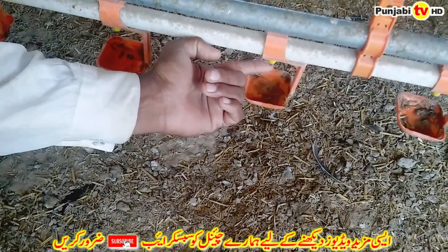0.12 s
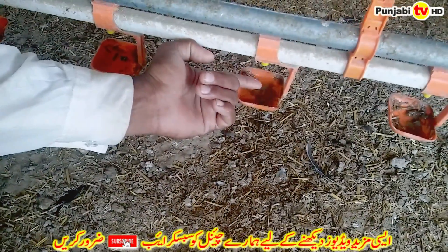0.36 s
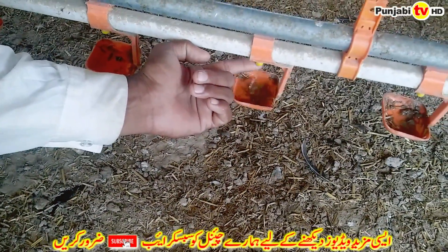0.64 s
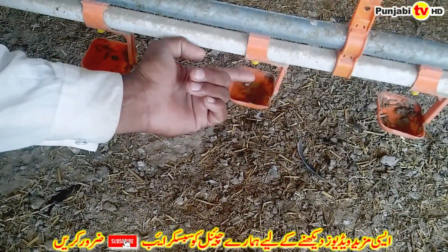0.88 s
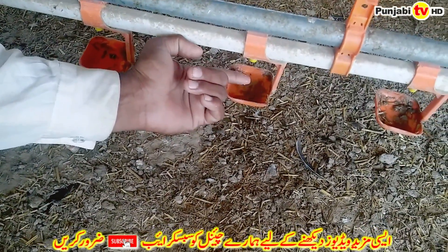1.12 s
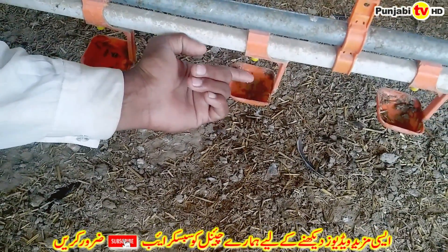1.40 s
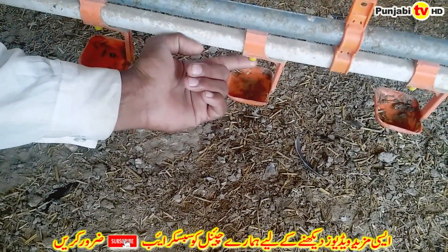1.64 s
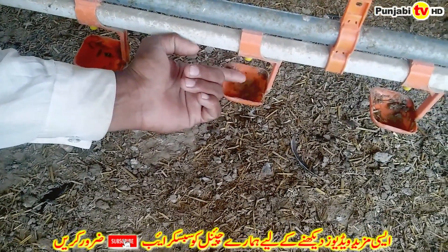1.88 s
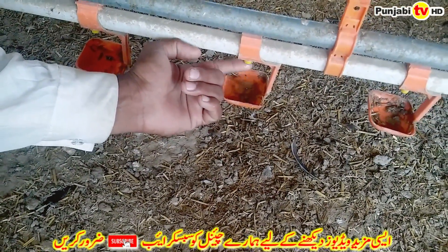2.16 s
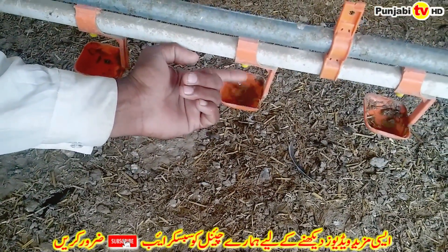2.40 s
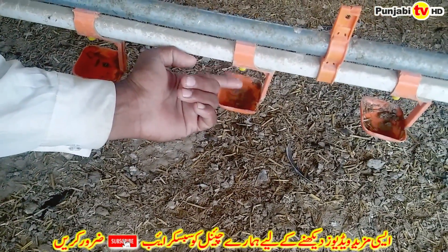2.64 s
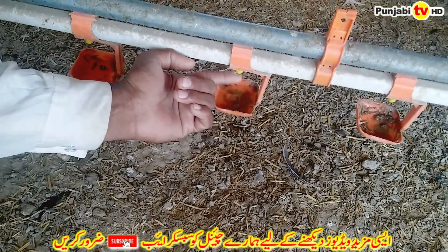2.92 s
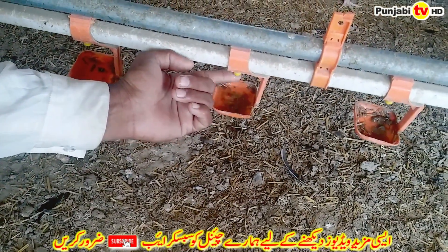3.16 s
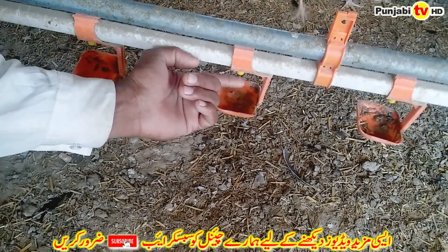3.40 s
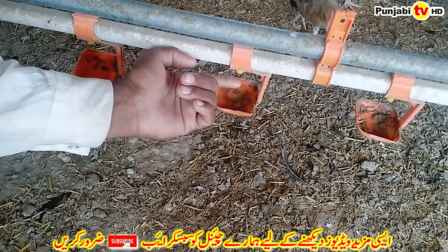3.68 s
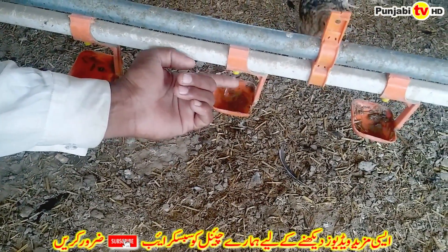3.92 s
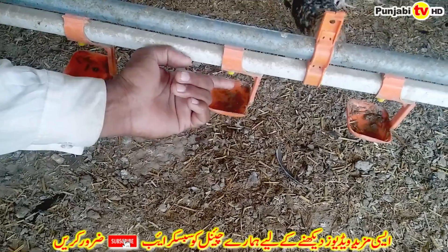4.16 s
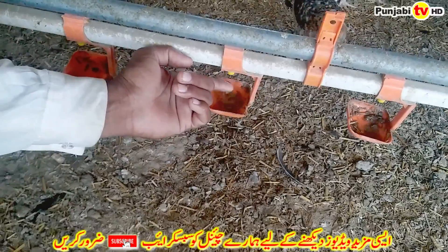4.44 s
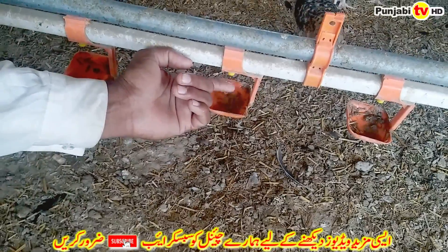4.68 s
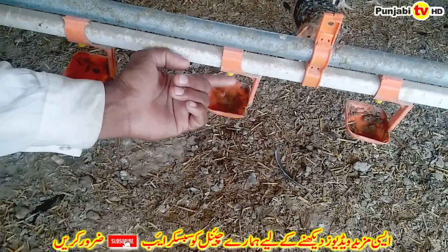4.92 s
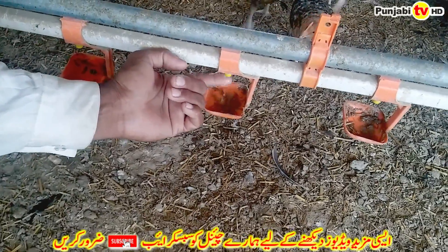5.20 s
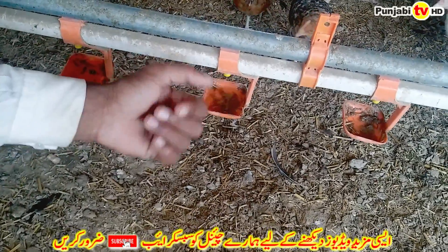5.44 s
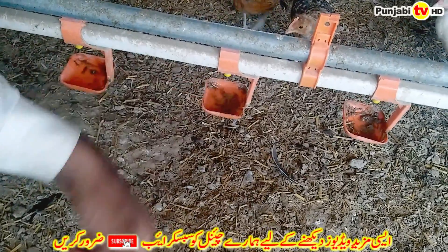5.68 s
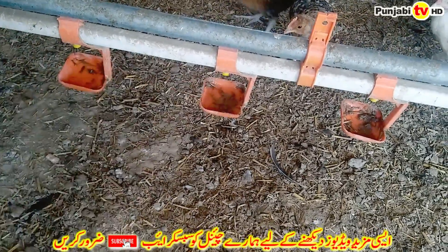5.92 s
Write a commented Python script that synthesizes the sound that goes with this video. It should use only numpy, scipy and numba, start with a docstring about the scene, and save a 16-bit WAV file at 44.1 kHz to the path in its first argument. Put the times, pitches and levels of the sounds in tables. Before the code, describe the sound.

Hundreds of chicks peep in a high continuous wash while a hand rattles drinker parts; one bird trills near the start, another squawks near the end.

```python
"""Shed of young chickens

Countless far peeps, glides of some tens of milliseconds, merge into a shrill wash; nearer ones glide through it.
One bird trills and one squawks close by, each with several rough voices at once. A flicked drinker pin and
knocked plastic ring as dying modes, scratched litter is crackly noise, the air is coloured noise, and a thin
electrical whine is a tone chopped sixty times a second."""
import sys
import numpy as np
from scipy import signal
from scipy.fft import rfft, irfft, next_fast_len
from scipy.io import wavfile
from scipy.ndimage import uniform_filter1d
from numba import njit

SR = 44100
rng = np.random.default_rng(int(sys.argv[2]) if len(sys.argv) > 2 else 0)


def gain_from_decibels(decibels):
    """Convert decibel values to linear amplitude factors."""
    exponent = np.asarray(decibels, float) / 20
    return 10 ** exponent


def put_to_file(sound):
    """Save the sound as 16-bit audio at rate SR, in the file named by the first command-line argument."""
    columns = np.atleast_2d(sound).T  # one column per channel
    safe = np.clip(columns, -1, 1)
    whole_steps = np.round(safe * 32767)
    wavfile.write(sys.argv[1], SR, whole_steps.astype(np.int16))


N = 267466


def evened(x):
    """Scales to rms 1."""
    return x / np.sqrt(np.mean(x ** 2) + 1e-20)


def read(points, hz):
    """Reads a spectrum on a log-frequency axis."""
    f, value = np.transpose(points)
    return np.interp(np.log(hz + 1), np.log(f + 1), value)


def gain_curve(points):
    """Gain over the scene from (t/s, level/dB) points."""
    s, db = np.transpose(points)
    return gain_from_decibels(np.interp(np.arange(N) / SR, s, db))


def add(mix, s, sound):
    """Mixes a sound in at s seconds."""
    part = mix[max(round(s * SR), 0):][:len(sound)]
    part += sound[:len(part)]


def coloured(x, db_at):
    """Filters x by a rule that gives dB at each frequency."""
    size = next_fast_len(len(x))
    gain = gain_from_decibels(db_at(np.fft.rfftfreq(size, 1 / SR)))
    return irfft(rfft(x, size) * gain, size)[:len(x)]


def wander(length, smooth_s):
    """Smooth random curve of rms 1."""
    size = max(round(smooth_s * SR), 2)
    once = uniform_filter1d(rng.standard_normal(length), size)
    return evened(uniform_filter1d(once, size))


def patchy(spectrum, patchy_db):
    """Noise of a given colour in patches that drift over time and frequency; rms 1."""
    frames, hz = N // 256 + 5, np.fft.rfftfreq(1024, 1 / SR)
    a, b, patches = rng.standard_normal((frames, 513, 3)).T
    patches = uniform_filter1d(patches, 8, 0)
    patches = evened(uniform_filter1d(patches, 10, 1))
    z = (a + 1j * b) * gain_from_decibels(read(spectrum, hz)[:, None] + patchy_db * patches)
    return evened(signal.istft(z, nperseg=1024, noverlap=768)[1][:N])


def shed(x):
    """Reverberation: sparse echoes of random sign, each band dying at its own speed."""
    # decay of the room: f/Hz, t60/s
    decay = [(300, 0.67), (1500, 0.94), (3000, 1), (6000, 0.2), (12000, 0.7)]
    taps = np.zeros(SR)
    at = np.arange(300, SR - 20, 20)
    taps[at + rng.integers(0, 20, len(at))] = rng.choice([-1., 1.], len(at))
    hz, t, z = signal.stft(taps, SR, nperseg=256)
    z = z * gain_from_decibels(-60 * t / read(decay, hz)[:, None])
    tail = signal.istft(z, SR, nperseg=256)[1]
    return signal.fftconvolve(x, tail / np.linalg.norm(tail))[:len(x)]


def whine():
    """Electrical whine: each chop restarts the tone, a little above or below its centre."""
    level_db, centre_hz, offset_hz = -68, 8850, 55
    chops_per_s, start_s, on_share = 59.995, .0035, .76
    chops = (np.arange(N) / SR - start_s) * chops_per_s + 1
    which, u = chops.astype(int), chops % 1
    side, wobble = rng.random((which[-1] + 1, 2)).T
    hz = centre_hz + offset_hz * (np.sign(side - .5) + wobble - .5)
    gate = np.clip(np.minimum(u, on_share - u) / .08, 0, 1)
    tone = np.sin(2 * np.pi * hz[which] * u / chops_per_s)
    return gain_from_decibels(level_db) * evened(gate * tone)


def air():
    """Noise: steady drone of fans, changing rumble of shuffling feet, hiss of the farthest birds."""
    # rumble of feet: t/s, level/dB rms
    rumble = [(0.0, -49.5), (0.13, -50), (0.57, -46), (0.99, -50), (2.41, -48.5), (2.62, -52), (3.04, -49),
              (3.93, -53.5), (5.7, -50), (6.06, -53.5)]
    # spectra of feet, fans and hiss: f/Hz, relative density/dB
    feet_colour = [(80, -29), (140, -7), (200, 2), (280, 0.5), (500, -4.5), (1300, -7), (2500, -45)]
    fans_colour = [(25, -60), (40, -12.5), (55, 0), (90, -2.5), (140, -5), (250, -26), (600, -60)]
    hiss_colour = [(3800, -10), (5000, 9), (6000, 8), (6800, 3), (7400, -4), (8200, -9), (10000, -12),
                   (13000, -25), (15700, -30)]
    feet = gain_curve(rumble) * patchy(feet_colour, 2.2)
    fans = gain_from_decibels(-55) * patchy(fans_colour, 0.44)
    hiss = gain_from_decibels(-55) * patchy(hiss_colour, 2.5)
    return feet + fans + hiss


@njit
def scatter(length, starts, sizes, hz, fall, lengths, unsteady, overtone, rate):
    """Sums falling glides; each reads the unsteadiness from its own place."""
    out = np.zeros(length)
    for k in range(len(starts)):
        angle = 0.
        for i in range(min(lengths[k], length - starts[k])):
            u = i / lengths[k]
            glide_hz = hz[k] * (1 - fall[k] * (u - .5))
            angle += 2 * np.pi * glide_hz * unsteady[(k * 7919 + i) % length] / rate
            out[starts[k] + i] += sizes[k] * u * (1 - u) * np.sin(angle + overtone * np.sin(angle))
    return out


def flock(count=4800):
    """Many hundreds of falling peeps a second, at every pitch a chick can reach and many strengths."""
    # loudness of the far flock: t/s, level/dB
    loudness = [(0.0, -34.5), (0.25, -34), (0.61, -35), (0.99, -33.5), (3.39, -36.5), (3.88, -35),
                (4.08, -35.5), (6.06, -34.5)]
    # filter on the flock: f/Hz, gain/dB
    colour = [(1400, -21), (2000, -16), (2600, -5), (3300, -1), (4000, -3), (4800, -14), (6000, -13),
              (7000, -12.5), (8200, -40), (12000, -72)]
    when, pitch, fall, length, size = rng.random((count, 5)).T
    total = N + SR  # the first second only fills the echoes
    starts = (when * total).astype(np.int64)
    sizes = gain_from_decibels(-2.3 * np.log(size + .04))
    lengths = ((.025 + .06 * length) * SR).astype(np.int64)
    unsteady = 1 + 0.0078 * wander(total, 0.0031)
    out = scatter(total, starts, sizes, 1400 * 2 ** (2.1 * pitch), .06 + .25 * fall,
                  lengths, unsteady, 0.15, SR)
    out = coloured(out, lambda hz: read(colour, hz))
    # the flock's echo drifts round between three different reverberation tails
    turn = np.arange(total) * 2 * np.pi * 3.1 / SR
    echoes = sum(shed(out * np.cos(turn + k * np.pi / 3)) for k in range(3))
    far = evened(evened(echoes) + .82 * evened(out))[SR:]
    return far * gain_curve(loudness)


def scratches():
    """Feet and beaks in dry litter: crackly noise bursts that start sharply, duller toward the treble."""
    # bursts: t/s, level before filtering/dB, decay to 1/e/s, treble fall from 5.2 to 10.5 kHz/dB per octave
    bursts = [(0.453, -52.5, 0.023, 20.5), (0.6, -59.5, 0.05, 18), (0.779, -56, 0.034, 21),
              (0.85, -60.5, 0.047, 27), (0.991, -60, 0.034, 27), (1.3778, -56, 0.021, 19),
              (1.926, -63.5, 0.056, 31), (1.99, -60, 0.03, 29.5), (2.2029, -55.5, 0.041, 13),
              (2.95, -65, 0.027, 15), (3.274, -52.5, 0.011, 32), (3.311, -47.5, 0.011, 29.5),
              (3.6526, -66, 0.038, 2), (4.21, -63.5, 0.044, 18), (4.308, -63, 0.038, 14),
              (4.546, -55, 0.065, 14), (4.657, -53.5, 0.022, 20), (5.238, -61, 0.085, 26),
              (5.4969, -53, 0.035, 2), (5.561, -57, 0.03, 32), (5.931, -56.5, 0.016, 16)]
    # filter of the litter: f/Hz, gain/dB
    litter = [(500, -35), (3500, 0), (10500, 0), (13000, -4), (16000, -7)]
    out = np.zeros(N)
    t = np.arange(round(.15 * SR)) / SR
    for s, db, length, dull_db in bursts:
        grit = rng.standard_normal(len(t)) * gain_from_decibels(3 * wander(len(t), .002))
        grit = coloured(grit, lambda hz: read(litter, hz)
                        - dull_db * np.log2(np.clip(hz, 5200, 10500) / 10500))
        shape = np.exp(-(t / max(length, .003)) ** 2) * np.minimum(t / .001, 1)
        add(out, s, gain_from_decibels(db - 0.5) * grit * shape)
    return out


def pin():
    """Drinker pin flicked by a finger: small steel rings very high and briefly."""
    # flicks: t/s, level of a 0 dB mode/dB
    flicks = [(0.2728, -51), (0.9637, -46.5), (2.0757, -63), (2.1211, -65), (3.1428, -58), (3.1916, -62),
              (3.2266, -62), (4.0861, -61), (5.9733, -68)]
    # modes of the pin: f/Hz, level/dB, t60/s
    modes = [(11200, -1.5, 0.062), (11300, -7, .06), (9500, -10, .04)]
    out, t = np.zeros(N), np.arange(round(.2 * SR)) / SR
    sound = sum(gain_from_decibels(db - 60 * t / t60) * np.sin(2 * np.pi * hz * t) for hz, db, t60 in modes)
    for s, db in flicks:
        add(out, s, gain_from_decibels(db) * sound)
    return out


def ring(modes, weights_db, length_s=.2):
    """Dying modes after a blow, slightly detuned each time; peak 1."""
    t = np.arange(round(length_s * SR)) / SR
    detune = 1 + 0.033 * rng.standard_normal(len(modes))
    sound = np.zeros(len(t))
    for (hz, db, t60), weight_db, d in zip(modes, weights_db, detune):
        sound += gain_from_decibels(db + weight_db - 60 * t / t60) * np.sin(2 * np.pi * hz * d * t)
    return sound / abs(sound).max()


def knocks(faint_count=50):
    """Cups and pipe: soft rattles with a rebound excite the modes near the spot's pitch; faint pecks between."""
    # blows: t/s, peak level/dB, pitch of the spot struck f/Hz
    blows = [(0.356, -27.5, 1210), (0.59, -25.5, 1060), (0.42, -36, 320), (0.605, -33, 720),
             (0.78, -27.5, 623), (1.012, -36, 1050), (1.168, -37.5, 1200), (1.253, -32, 690),
             (1.26, -31, 1050), (1.738, -33.5, 900), (2.441, -28.5, 348), (2.462, -33, 300),
             (2.593, -39, 690), (2.851, -39.5, 867), (3.051, -36, 725), (3.252, -39, 260), (4, -38, 1090),
             (4.418, -34, 1230), (4.599, -29, 1210), (4.644, -30, 1210), (4.652, -37, 600),
             (4.765, -36, 720), (4.926, -31.5, 1200), (4.976, -34, 1060), (5.023, -32.5, 1200),
             (5.171, -28.5, 775), (5.195, -34, 480), (5.281, -28, 700), (5.3, -34, 450),
             (5.361, -37.5, 576), (5.53, -35, 1000), (5.562, -33, 1000), (5.565, -36, 270),
             (5.881, -37, 656)]
    # modes of the plastic: f/Hz, level/dB, t60/s
    plastic = [(285, 2, 0.044), (405, 1.5, 0.032), (605, 1.5, 0.085), (719, 6, 0.05), (881, 4.5, 0.03),
               (1097, 8.5, 0.054), (1200, 8.5, 0.032), (1400, -8, 0.038)]
    out, hz, t = np.zeros(N), np.transpose(plastic)[0], np.arange(3000) / SR
    faint = [(when * N / SR, -46 + 7 * size, 500 * 3 ** spot)
             for when, size, spot in rng.random((faint_count, 3))]
    late = np.maximum(t - .022, 0)
    push = t * np.exp(-t / .005) + .12 * late * np.exp(-late / .008)  # blow and rebound
    for s, db, spot_hz in list(blows) + faint:
        rattle = rng.standard_normal(len(t)) * push
        sound = signal.fftconvolve(ring(plastic, -24 * abs(np.log2(hz / spot_hz))), rattle)
        # little below the spot's pitch
        sound = coloured(sound, lambda f: -14 * np.maximum(np.log2(spot_hz / (f + 1)) - .5, 0))
        add(out, s - .003, gain_from_decibels(db) * sound / abs(sound).max())
    return out


def voice(hz, jitter, flutter_db, overtones_db):
    """The syrinx: nearly a sine with unsteady pitch and strength, and weak overtones."""
    turns = np.cumsum(hz * (1 + jitter * wander(len(hz), 0.0017))) / SR
    partials_db = [0, *overtones_db]
    tone = sum(gain_from_decibels(db) * np.sin(2 * np.pi * k * turns) for k, db in enumerate(partials_db, 1))
    return np.sqrt(2) * tone * gain_from_decibels(flutter_db * wander(len(hz), 0.0026))


def peeps(rows):
    """Each peep is one glide with a quick start and a softer end; low voices are hoarser."""
    out = np.zeros(N)
    for s, db, length, start_hz, end_hz in rows:
        u = np.linspace(0, 1, round(length * SR))
        shape = np.sin(np.pi * u ** 0.82) ** 1.38
        jitter = .006 + 1e5 / (start_hz * end_hz)
        glide_hz = start_hz + (end_hz - start_hz) * u
        add(out, s, gain_from_decibels(db) * shape * voice(glide_hz, jitter, 3.5, [-36]))
    return out


def chatter(range_hz, tilt_db, count):
    """Peeps at random moments, mostly falling, tilted in level across the pitch range; rms 1."""
    when, pitch, fall, length, size = rng.random((count, 5)).T
    hz = range_hz[0] * (range_hz[1] / range_hz[0]) ** pitch
    end_hz = hz * (1.03 - .25 * fall ** 2)
    level_db = tilt_db * pitch - 8 * size
    return evened(peeps(zip(when * N / SR, level_db, .03 + .05 * length, hz, end_hz)))


def neighbours():
    """Birds a few steps away call at random: low voices vary in level, high ones keep one level."""
    # low voices: t/s, level/dB rms
    low_level = [(0.0, -43), (0.79, -43.5), (2.8, -45), (3.46, -52.5), (4.42, -47.5), (4.88, -50.5),
                 (5.13, -50), (5.67, -48), (6.06, -50)]
    low = gain_curve(low_level) * chatter((1620, 2350), 4.1, count=340)
    high = gain_from_decibels(-43.5) * chatter((2600, 4900), -9, count=120)
    return low + high


def near_peeps():
    """The nearest single peeps, each a short glide."""
    # peeps: t/s, peak level before flutter/dB rms, length/s, start f/Hz, end f/Hz
    calls = [(.031, -37, 0.041, 3350, 2940), (.181, -40, .037, 3860, 4080), (.255, -41, 0.056, 2400, 2180),
             (.392, -42, .03, 1810, 1800), (.44, -39, .045, 1960, 1944), (.502, -38, .033, 2780, 2400),
             (.627, -36.5, .12, 2850, 1802), (.66, -37, 0.067, 2190, 1410), (.669, -37, 0.043, 3360, 3100),
             (.679, -40, .039, 1390, 1550), (.764, -37, 0.043, 3830, 2880),
             (.792, -35.5, 0.088, 2590, 2070), (.898, -30.5, .045, 2510, 2120),
             (.927, -49, .086, 5790, 4480), (.962, -35, 0.065, 2590, 2350), (.972, -38, .045, 3190, 3190),
             (1.05, -36.5, .065, 2080, 1710), (1.052, -41, 0.069, 1626, 1470),
             (1.063, -42, .033, 4650, 3960), (1.094, -33, .03, 3600, 2550), (1.119, -47, .063, 5410, 4370),
             (1.124, -36.5, 0.049, 3810, 3710), (1.214, -39, .043, 2436, 1500),
             (1.231, -39, .048, 2316, 1396), (1.27, -46, .06, 5400, 5500), (1.335, -46, .05, 5200, 4300),
             (1.382, -38, .039, 3190, 3240), (1.398, -39.5, .032, 2400, 1550),
             (1.544, -42.5, 0.06, 1970, 1204), (1.617, -38, .099, 3400, 2910),
             (1.742, -38, .066, 2420, 2230), (1.758, -44, .052, 4850, 4450),
             (1.939, -41.5, .033, 1767, 1610), (2.007, -35, .045, 3960, 3040),
             (2.024, -34, 0.039, 2210, 2000), (2.045, -36.5, .043, 2200, 1600),
             (2.155, -41, 0.078, 1940, 1680), (2.25, -46, .06, 5140, 5150), (2.274, -43, 0.048, 4490, 3980),
             (2.27, -41, .054, 2330, 2270), (2.275, -36.5, 0.052, 1940, 1995),
             (2.31, -46, 0.069, 5100, 4650), (2.435, -45, .028, 4850, 4500), (2.52, -43, 0.064, 5200, 3920),
             (2.673, -42, 0.085, 1760, 1853), (2.762, -47.5, 0.087, 5200, 4450),
             (2.863, -44, .076, 1747, 1550), (3.259, -42, .045, 1730, 1765),
             (3.342, -47.5, .05, 1380, 1350), (3.355, -43, .033, 4850, 4450), (3.39, -42, .05, 2120, 2040),
             (3.384, -45.5, .077, 4350, 4200), (3.539, -46, .061, 4840, 4170),
             (3.621, -32.5, .048, 3280, 3010), (3.649, -34.5, 0.047, 3590, 2850),
             (3.725, -37, 0.041, 3490, 3220), (3.822, -38, 0.033, 1273, 1610),
             (3.843, -33, 0.064, 3360, 2970), (3.875, -43, 0.074, 1480, 1457),
             (3.983, -42, .057, 4450, 4170), (4.029, -39, 0.085, 3600, 2965),
             (4.14, -41, 0.038, 3410, 3200), (4.14, -37, 0.053, 3000, 2290), (4.222, -41.5, .1, 5040, 3940),
             (4.231, -43, .065, 2050, 2065), (4.318, -41.5, .065, 4200, 4250),
             (4.345, -37, 0.035, 3640, 3250), (4.43, -43, .045, 4800, 4400), (4.495, -39, .051, 3700, 3800),
             (4.628, -39, .1, 4440, 4130), (4.664, -38, 0.032, 3200, 2880),
             (4.815, -35.5, 0.081, 3880, 3070), (4.874, -34, .032, 3080, 2770),
             (4.908, -43, .065, 4400, 4330), (4.925, -38, .038, 3070, 2860), (4.988, -39, .038, 2400, 2600),
             (5.083, -39.5, 0.047, 2650, 1390), (5.162, -37, .04, 3150, 3030),
             (5.227, -37, .063, 2004, 1584), (5.32, -42.5, .029, 1790, 1400),
             (5.332, -39, .033, 2380, 2250), (5.36, -40, 0.04, 4520, 3550), (5.389, -42, 0.026, 1600, 1720),
             (5.475, -39, .035, 5650, 5000), (5.483, -38, .019, 1696, 1670), (5.518, -42, .045, 1690, 1570),
             (5.611, -33.5, 0.049, 2090, 1500), (5.606, -45, .04, 5850, 5750),
             (5.688, -41, .035, 3990, 4180), (5.724, -39, 0.047, 1516, 1335),
             (5.755, -45, .045, 5100, 5200), (5.768, -30, .04, 2800, 2000),
             (5.783, -31.5, 0.033, 2220, 1620), (5.806, -38, .045, 4080, 3780),
             (5.841, -34, .06, 3710, 2970), (5.89, -34.5, 0.042, 2400, 1860),
             (5.944, -37, 0.029, 2900, 2620), (5.984, -39, 0.034, 3820, 4020),
             (6.032, -33.5, 0.038, 2400, 1510)]
    return peeps(calls)


def cry(voices, throb_hz, throb_db, sag_per_db, climb_per_s, jitter, overtones_db, rasp):
    """Rough voices of one throat throb together; pitch sags with less effort and drifts with time."""
    edge_db = -20  # effort where a voice starts and stops
    out = np.zeros(N)
    for (peak_s, db, hz, rise, fall), overtone_db in zip(voices, overtones_db):
        t = np.arange(-rise, fall, 1 / SR)
        effort_db = edge_db * np.maximum(-t / rise, t / fall)
        throb = throb_db * np.cos(2 * np.pi * throb_hz * (t + peak_s - voices[0][0]))
        pitch_hz = hz * (1 + sag_per_db * effort_db + climb_per_s * t)
        tone = voice(pitch_hz, jitter, 3.3, overtone_db)
        tone = tone * (1 + rasp * wander(len(t), 0.00059))
        edges = signal.windows.tukey(len(t), .1)
        add(out, peak_s - rise, gain_from_decibels(db + effort_db + throb) * tone * edges)
    return out


def trill():
    """One bird trills: two voices throbbing 40 times a second."""
    # voices: peak t/s, level before throb and rasp/dB rms, f/Hz, rise/s, fall/s
    voices = [(.31, -28, 2900, .13, .13), (.28, -31.5, 3300, .11, .2)]
    return cry(voices, throb_hz=40, throb_db=3.5, sag_per_db=.007, climb_per_s=0.0094, jitter=.012,
               overtones_db=[[-16, -42], [-36]], rasp=.35)


def squawk():
    """One bird squawks: six raspy voices at once, climbing."""
    # voices: peak t/s, level before throb and rasp/dB rms, f/Hz, rise/s, fall/s
    voices = [(5.512, -26.5, 2450, .014, 0.096), (5.522, -23.5, 3130, .02, .06),
              (5.512, -28, 3950, .012, .035), (5.572, -29, 4070, .06, .09), (5.503, -30, 4950, .015, .1),
              (5.55, -38, 5450, .06, .07)]
    return cry(voices, throb_hz=46, throb_db=3, sag_per_db=.0005, climb_per_s=.6, jitter=.013,
               overtones_db=[[-22, -32], [-30, -42], [-38], [-38, -35], [-28], [-30]], rasp=.55)


def scene():
    """Near sources with a little of the shed, over the far flock and the air."""
    background = whine() + air() + flock()
    near = scratches() + pin() + knocks()
    birds = neighbours() + near_peeps() + trill() + squawk()
    echoes = shed(gain_from_decibels(-11) * birds + gain_from_decibels(-12.5) * near)
    return (background + near + birds + echoes)[None]


def roll_off(x):
    """The treble ends steeply here."""
    return signal.sosfilt(signal.butter(12, 15870, fs=SR, output="sos"), x)


def record(dry):
    """The microphone cuts the lowest bass."""
    bass_cut = signal.butter(6, 44, "high", fs=SR, output="sos")
    mix = signal.sosfilt(bass_cut, dry)
    return roll_off(mix)


dry = scene()
out = record(dry)
put_to_file(out)
```